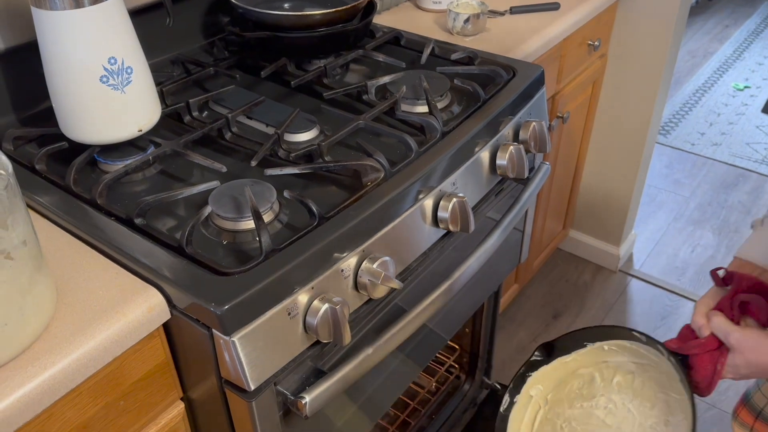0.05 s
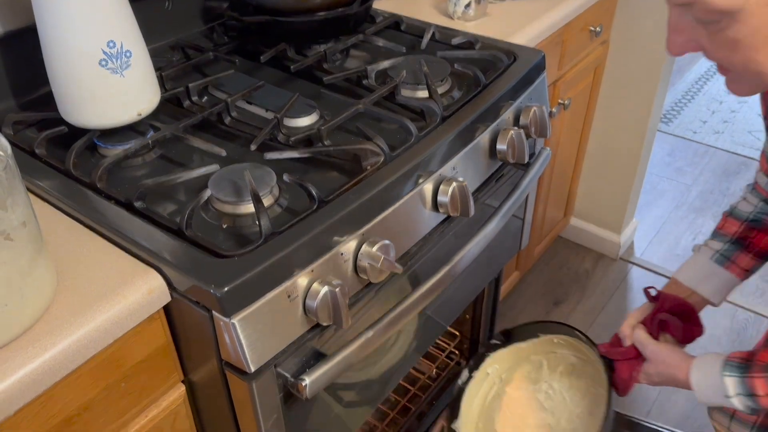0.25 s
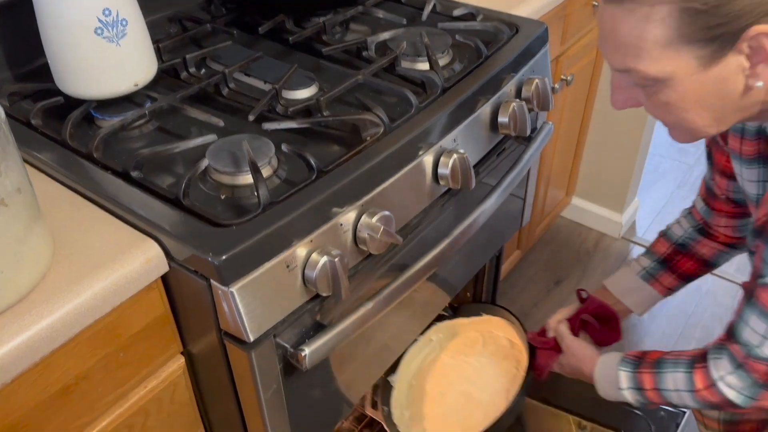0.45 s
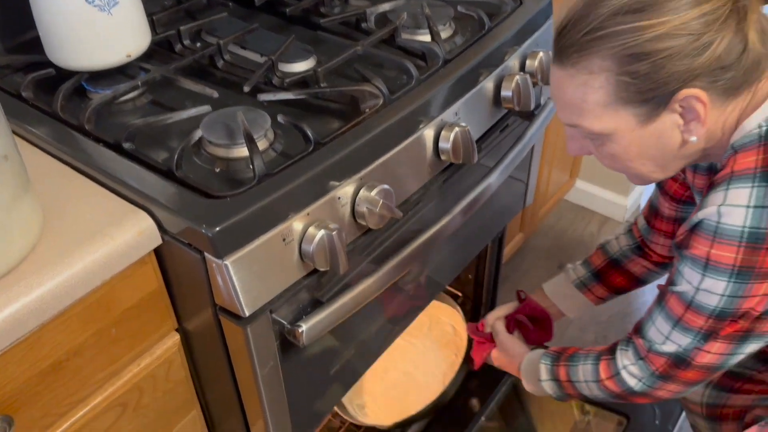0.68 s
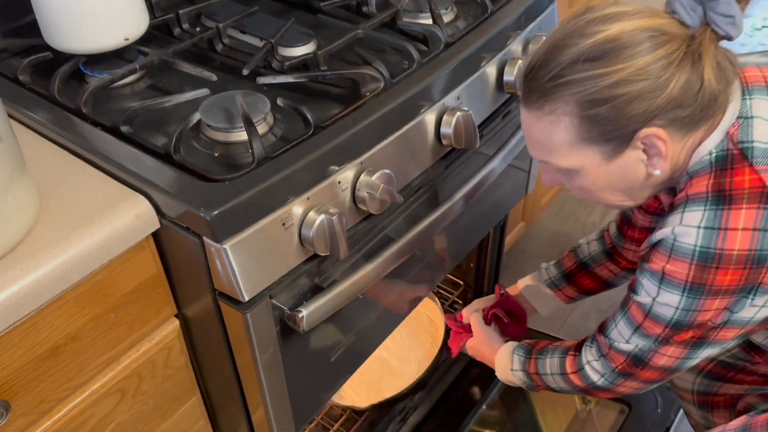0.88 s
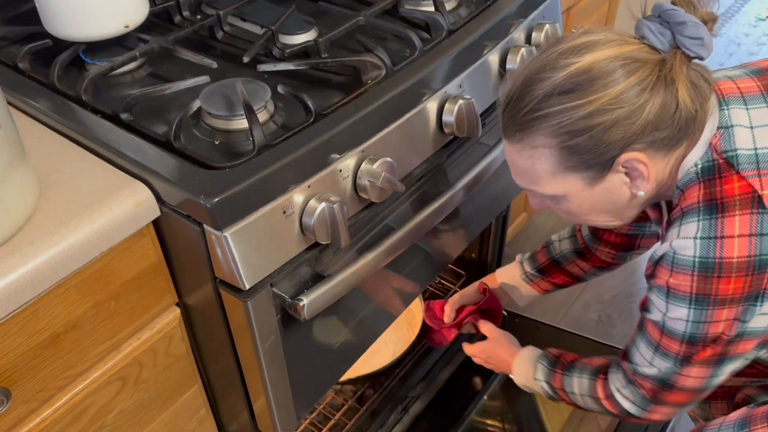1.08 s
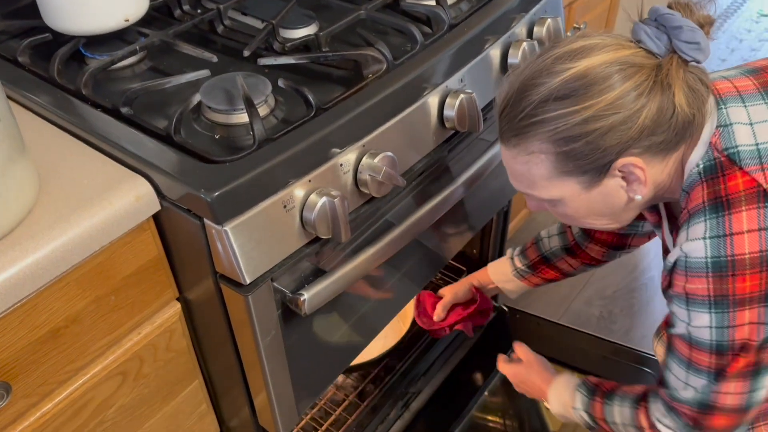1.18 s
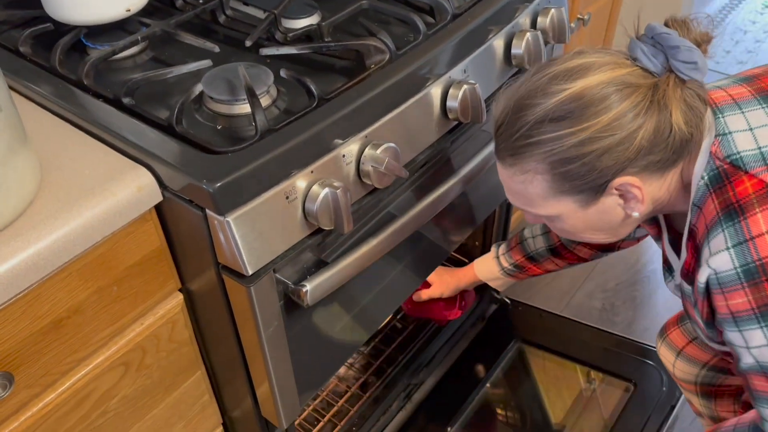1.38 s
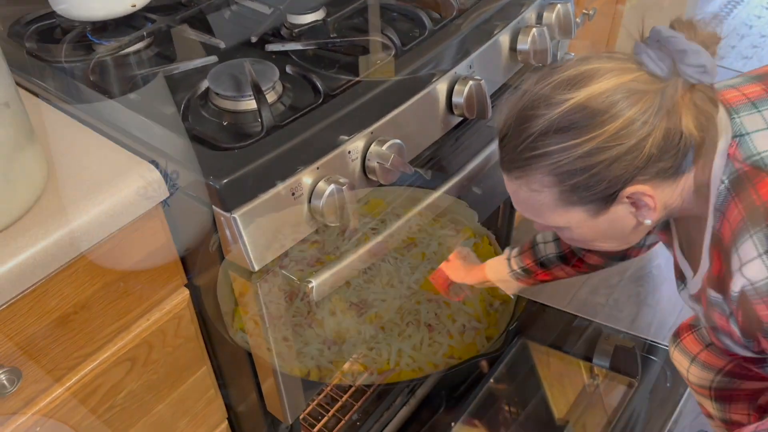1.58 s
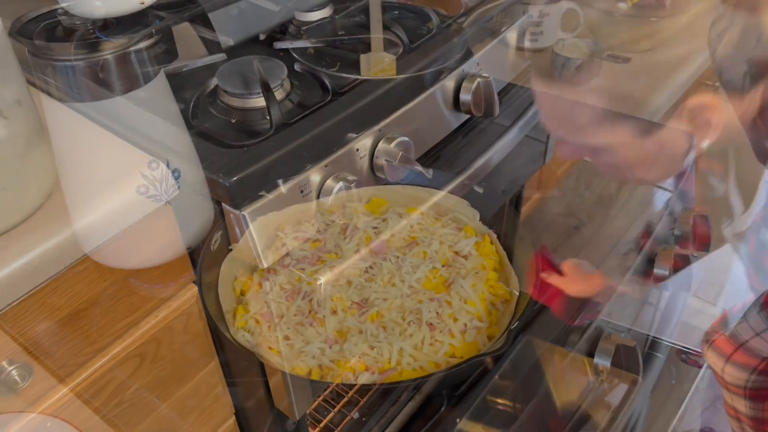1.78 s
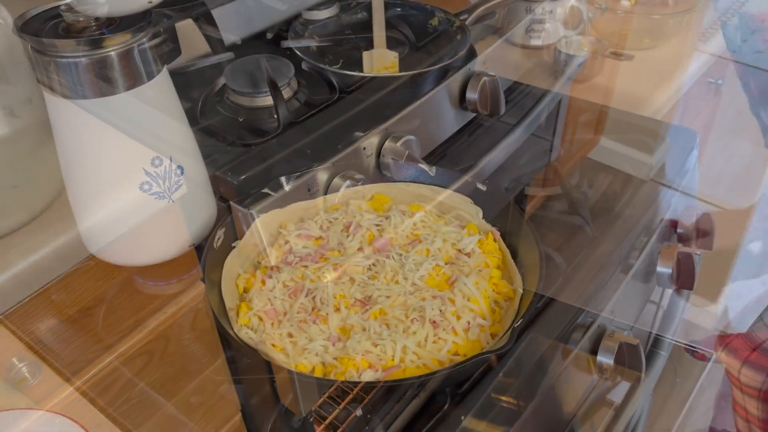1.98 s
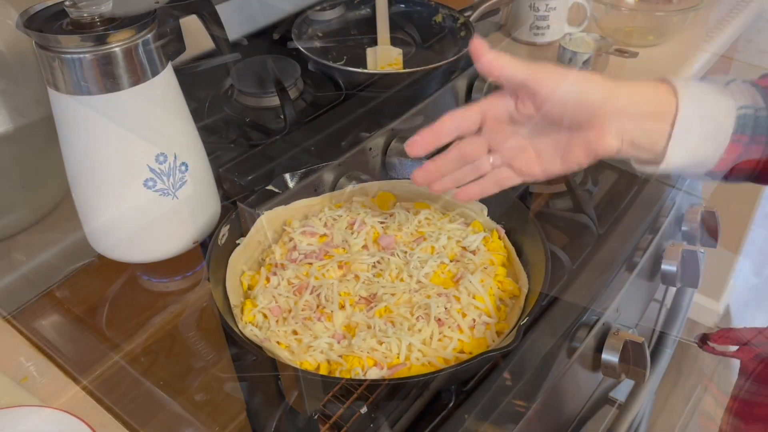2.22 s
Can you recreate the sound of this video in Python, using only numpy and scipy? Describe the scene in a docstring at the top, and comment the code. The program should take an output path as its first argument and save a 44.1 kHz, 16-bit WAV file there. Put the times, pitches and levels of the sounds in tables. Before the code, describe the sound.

A heavy iron pan scrapes over an oven's wire rack in a quiet kitchen. First come a soft rustle and small knocks, until 0.4 seconds, over an electrical hum. At 0.8 the pan lands and slides; a second shove runs from 1.3 to 1.8, jolting over the wires and ringing on. Faint ticks and a tiny squeak follow just after 2 seconds, as the hum becomes a low rumble.

```python
"""A soft rustle and a few small knocks sound over a mains hum in a quiet kitchen. Then a heavy iron pan is
set on an oven's wire rack and pushed in with two scraping shoves. Friction on dense grit drives the modes
of the rack and oven walls; the pan jolts over the wires and rings on in free vibration. Faint ticks and a
squeak follow, while the hum gives way to a lower rumble."""
import sys
import numpy as np
from scipy import signal
from scipy.fft import rfft, irfft
from scipy.io import wavfile
from scipy.ndimage import uniform_filter1d

SR = 44100
rng = np.random.default_rng(int(sys.argv[2]) if len(sys.argv) > 2 else 0)


def pcm_store(signal):
    """Save signal as 16-bit PCM."""
    levels = np.round(np.clip(np.atleast_2d(signal), -1, 1) * 32767)
    wavfile.write(sys.argv[1], SR, levels.astype(np.int16).T)


N = 99225
T = np.arange(N) / SR

# One envelope per shove (time [s], rumble level [dB], scrape level [dB], hiss level [dB])
SHOVE_ENVELOPES = [
    [(0.809, -46, -44, -49), (0.816, -60, -34.5, -43.5), (0.824, -48, -30, -36), (0.836, -27.5, -26, -28),
     (0.86, -31, -29.5, -32.5), (0.93, -38.5, -30.5, -29), (0.962, -36.5, -29, -32.5),
     (1.005, -35, -29.5, -34.5), (1.04, -39, -36, -39), (1.072, -38, -33.5, -39),
     (1.088, -46, -39.5, -43.5), (1.126, -42, -39.5, -49.5), (1.194, -47, -42.5, -52.5),
     (1.244, -53, -47, -57), (1.26, -59, -45, -67)],
    [(1.278, -49.5, -50, -51), (1.294, -55, -41.5, -49.5), (1.362, -47.5, -53.5, -55.5),
     (1.385, -39, -41.5, -47), (1.41, -44.5, -39, -47.5), (1.444, -41.5, -30, -34.5),
     (1.514, -38, -36.5, -42.5), (1.524, -45.5, -30, -34), (1.544, -38, -33.5, -40), (1.652, -44, -42, -52),
     (1.686, -48, -51, -69), (1.7, -60.5, -42, -50), (1.736, -46, -56.5, -55.5), (1.802, -79, -52, -66.5),
     (1.818, -53, -66.5, -64.5), (1.9, -83, -68.5, -99)],
]
# Scrape, heard with a gap in the treble near 11 kHz (frequency [Hz], spectral density [dB])
SCRAPE_AS_HEARD = [(35, -32), (60, 5.5), (111, 8), (146, 10.5), (192, 11.5), (600, 11), (866, 13.5),
                   (963, 7), (1820, 6), (2720, -16.5), (9500, -25), (11400, -72.5), (13500, -30),
                   (16000, -41)]
# Low, dull, bright, high and top bands of the scrape (lower edge [Hz], upper edge [Hz])
SCRAPE_BANDS = [(50, 400), (400, 1000), (1000, 2600), (2600, 9000), (9000, 19000)]
# Treble resonances of thin metal (frequency [Hz], bandwidth [Hz], gain [dB])
METAL_FORMANTS = [(3934, 100, -20), (4830, 900, -5.5), (5730, 320, -9.5), (6920, 790, -7),
                  (8900, 920, -12.5)]
# Brightness of the scrape (time [s], bright band over dull band [dB])
SCRAPE_TILT = [(.86, 4.5), (1., 5), (1.1, 0.5), (1.28, -1), (1.41, 3.5), (1.47, 7.5), (1.54, 3.5),
               (1.62, 3), (1.72, -3)]
# The pan crosses the wires (time [s], relative level [dB], top band gain [dB])
WIRE_JOLTS = [(0.816, -21, -14), (0.8334, -27, 22.5), (1.279, -32, -6), (1.3264, -42, 16.5),
              (1.3764, -37.5, 17.5), (1.4127, -22.5, 5.5), (1.4414, -22.5, 1), (1.518, -47, 2),
              (1.604, -26.5, 5), (1.6524, -31, 2), (1.6928, -29, 5)]
# Rack wires and oven walls (frequency [Hz], level [dB], mid-slide offset [dB], late offset [dB])
RACK_MODES = [(119, 2, 5.5, -11), (205, -8.5, 1, 0.5), (291, -3.5, 5, 6), (439.3, -3.5, 2.5, 7),
              (529, -0.5, -7.5, 5), (606, 3.5, -2, -5.5), (752.4, -2.5, 4, 2.5), (895, -5.5, -3, -7),
              (1116, -9, 2.5, 0), (1293, -1, 2.5, -2.5), (1418, -5, 3, -4), (1790, 10, -12, -25),
              (1960, -9.5, 10.5, -0.5), (2117, 1, 2, -7), (2257, -3, 1, 2), (2853, -21, 5, -6),
              (4000, -11.5, -6, -4.5)]
# Impulses that excite the pan, and those of the ticks (time [s], level [dB])
PAN_NUDGES = [(.95, 4.5), (1.03, -4.5), (1.2, -10), (1.282, 0.5), (1.662, 0), (1.727, -11.5)]
TICK_IMPULSES = [(2.029, -23.5), (2.047, -14)]
# Modes of the pan, the door and the ticks (frequency [Hz], level [dB], decay T60 [s])
PAN_MODES = [(447, -12, .5), (522, -11, .5), (549, -17, 1.4), (772, -11, .6), (811, -9, 1.2), (824, 0, .95),
             (1104, -14, .3), (2040, -19, .4), (2164, -16, .35), (2250, -17, .45)]
DOOR_MODES = [(309, 0.5, 0.056), (247, -2, 0.44)]
TICK_MODES = [(1620, -10, .025), (2480, -17, .015), (3170, -21, .025), (4160, -26, .02)]
# Small knocks (time [s], level [dB], centre frequency [Hz], bandwidth [Hz], decay T60 [s])
KNOCK_BURSTS = [(.129, -53.5, 1090, 1900, 0.089), (0.293, -48.5, 2570, 5450, 0.12),
                (0.294, -61, 14800, 3000, 0.077), (0.293, -51, 740, 197, 0.15),
                (0.368, -55, 915, 1310, 0.19)]
# Rustle, heard with a gap in the treble near 11 kHz (frequency [Hz], spectral density [dB])
RUSTLE_AS_HEARD = [(800, -14), (3000, 0), (5000, -6), (9000, -6), (11400, -24), (14500, -16)]
# Squeak (time [s], duration [s], frequency [Hz], level [dB])
SQUEAK_TONES = [(2.15, 0.04, 2684, -58.5)]
# Mains hum (frequency [Hz], level [dB])
HUM_PARTIALS = [(59.4, -61.5), (119, -56), (179.6, -54.5), (359.5, -72), (382.2, -76)]
# Air and rumble, each heard with a gap in the treble near 11 kHz (frequency [Hz], spectral density [dB])
AIR_AS_HEARD = [(18, -29.5), (30, -3), (183, -8), (227, -9), (330, -18), (595, -27), (776, -23),
                (1060, -35), (1450, -32), (2990, -45), (9500, -47), (11400, -80), (14000, -54)]
RUMBLE_AS_HEARD = [(18, -19), (30, 5), (108, 5.5), (158, -7.5), (435, -14), (540, -9), (609, -20.5),
                   (814, -9), (1350, -26.5), (2460, -33), (3100, -41), (6000, -46), (9500, -47),
                   (11400, -80), (14500, -64)]
# Stereo width (frequency [Hz], side gain [dB])
SIDE_GAIN = [(60, -21), (150, -20), (300, -12), (600, -7), (1500, -7), (4000, -2.5), (8000, -6),
             (14000, -12)]
# Stereo balance (frequency [Hz], left minus right [dB])
BALANCE = [(100, 1.5), (600, -1.5), (1200, -2.5), (2500, -4.5), (4500, 2), (10000, 1.5)]


def pan_on_rack():
    """Superposition: scrape, jolts and rack vibration add; independent contacts feed mid and side."""
    times, *levels = np.vstack(SHOVE_ENVELOPES).T
    rumble, scrape, hiss = (undb(np.interp(T, times, db, left=-120, right=-120)) for db in levels)
    bands = grit_bands()
    return stick_slip(bands, rumble, scrape, hiss) + wire_jolts(bands) + rack_vibration(rumble, scrape)


def grit_bands(grain_db=2):
    """Random excitation: uneven grit gives broadband noise, heard with a gap near 11 kHz."""
    grains = undb(grain_db * np.minimum(rng.exponential(size=N), 4))
    grit = colour(rng.standard_normal((2, N)) * grains, SCRAPE_AS_HEARD)
    low, dull, bright, high, top = (band(grit, *edges, order=3) for edges in SCRAPE_BANDS)
    sheen = sum(undb(db) * band(high, hz - width / 2, hz + width / 2, order=1)
                for hz, width, db in METAL_FORMANTS)
    return low, dull, bright, high + sheen, top


def stick_slip(bands, rumble, scrape, hiss, catch_db=1.5, catch_hz=46):
    """Stick-slip friction: the grit catches and slips, so each layer flutters about its envelope."""
    low, dull, bright, high, top = bands
    tilt = undb(np.interp(T, *np.array(SCRAPE_TILT).T) / 2)
    body = unit(dull / tilt + bright * tilt)
    treble = (high + top) / np.std(high)
    layers = unit(low) * rumble, body * scrape, treble * hiss
    return sum(layer * undb(catch_db * wander(catch_hz)) for layer in layers)


def wire_jolts(bands, gain_db=-15):
    """Impact excitation: brief contact with a wire gives a bright crack and a short noisy decay."""
    _, _, bright, high, top = bands
    out = 0
    for start, db, top_db in WIRE_JOLTS:
        decay = strike(start, attack=0.0021, t60=0.11)
        crack = undb(-4) * strike(start, attack=0.00105, t60=0.025)
        noise = (high + undb(top_db) * top + undb(-12.5) * bright) / np.std(high)
        out += undb(db + gain_db) * (decay + crack) * noise
    return out


def rack_vibration(rumble, scrape, mid_slide_s=.93, late_s=1.1, t60=.15):
    """Forced vibration: friction drives rack and wall modes, whose balance shifts as the pan goes in."""
    uneven_push = rng.standard_normal((2, N)) * undb(-5.5 + 2 * wander(rate_hz=25))
    out = 0
    for hz, db, mid_slide_db, late_db in RACK_MODES:
        envelope = scrape if hz > 400 else rumble
        contact_db = 2.5 * wander(rate_hz=7)  # each wire is touched on and off
        position_db = np.select([T > late_s, T > mid_slide_s], [late_db, mid_slide_db])
        force = uneven_push * envelope * undb(contact_db + position_db)
        out += ring(force, [(hz, db, t60)])
    return out


def pan_ring():
    """Free vibration: the lightly damped iron rings on after each nudge."""
    return ring(impulses(PAN_NUDGES), PAN_MODES)


def knocks():
    """Damped transients: each small knock is a band of noise that decays exponentially."""
    out = 0
    for start, db, hz, width, t60 in KNOCK_BURSTS:
        noise = band(rng.standard_normal(N), max(hz - width / 2, 150), hz + width / 2)
        out += undb(db) * strike(start, attack=0.00093, t60=t60) * unit(noise)
    return out


def rustle(peak_s=0.045, spread_s=0.056):
    """Amplitude modulation: one fluttering swell of hiss from cloth, heard with a gap near 11 kHz."""
    noise = unit(colour(rng.standard_normal(N), RUSTLE_AS_HEARD))
    swell = np.exp(-((T - peak_s) / spread_s) ** 2 / 2)
    return undb(-61.5 + 1.2 * wander(rate_hz=46)) * swell * noise


def door_bump(time_s=.378, level_db=-6):
    """Impulse response: one bump excites two low modes of the door."""
    return ring(impulses([(time_s, level_db)]), DOOR_MODES)


def ticks():
    """Heavy damping: high modes die away so quickly that they are heard as ticks."""
    return ring(impulses(TICK_IMPULSES), TICK_MODES)


def squeak(pitch_fall=.02, roughness=.012):
    """Frequency modulation: a short tone sinks slightly, roughened by random jitter in pitch."""
    out = 0
    for start, duration, hz, db in SQUEAK_TONES:
        progress = np.clip((T - start) / duration, 0, 1)
        pitch = hz * (1 + pitch_fall * np.exp(-progress / 0.3) + roughness * wander(rate_hz=280))
        phase = 2 * np.pi * np.cumsum(pitch) / SR
        out += undb(db) * np.sin(np.pi * progress) * np.sin(phase)
    return out


def reverberation(direct, low_t60=0.26, treble_t60=0.12, gain_db=-10.5):
    """Diffuse reflection: the room's tail decays exponentially, fastest in the treble."""
    noise = rng.standard_normal((2, SR))
    low = signal.lfilter([.25], [1, -.75], noise)
    t = T[:SR]
    tails = low * undb(-60 * t / low_t60) + (noise - low) * undb(-60 * t / treble_t60)
    tails /= np.sqrt(np.sum(tails ** 2, axis=1, keepdims=True))
    return undb(gain_db) * signal.fftconvolve(direct, tails, axes=1)[:, :N]


def mains_hum(waver_db=1.2):
    """Line spectrum: a few low partials of fixed frequency, each wavering slowly in level."""
    out = 0
    for hz, db in HUM_PARTIALS:
        amplitude = np.sqrt(2) * undb(db + waver_db * wander(rate_hz=2.6))
        out += amplitude * np.sin(2 * np.pi * hz * T + 7 * rng.random())
    return out


def ambient_noise(spectrum, level_db):
    """Partial coherence: steady noise, nearly alike in both ears in the bass and wider above."""
    mid, side = colour(rng.standard_normal((2, N)), spectrum)
    return undb(level_db) * unit(left_right(mid, side))


def kitchen(midpoint_s=1.71, fade_s=1):
    """Incoherent sources add in power: hum and air fade by a cosine as the rumble rises by a sine."""
    angle = np.clip((T - midpoint_s) / fade_s + .5, 0, 1) * np.pi / 2
    hum_and_air = mains_hum() + ambient_noise(AIR_AS_HEARD, level_db=-52.5)
    rumble = ambient_noise(RUMBLE_AS_HEARD, level_db=-47.5)
    return np.cos(angle) * hum_and_air + np.sin(angle) * rumble


def undb(db):
    """Decibel law: 20 dB is a factor of ten in amplitude."""
    return 10 ** (np.asarray(db) / 20)


def unit(x):
    """Normalisation to an RMS of one."""
    return x / np.sqrt(np.mean(x ** 2))


def colour(x, points):
    """Zero-phase filtering through points of (frequency [Hz], gain [dB])."""
    hz, db = np.array(points, float).T
    bins_hz = np.maximum(np.arange(N + 1) * SR / (2 * N), 1)
    gain = undb(np.interp(np.log(bins_hz), np.log(hz), db))
    return irfft(rfft(x, 2 * N) * gain)[..., :N]


def band(x, lo_hz, hi_hz, order=2):
    """Band-pass filtering with a maximally flat passband."""
    edges = [lo_hz, min(hi_hz, .45 * SR)]
    return signal.sosfilt(signal.butter(order, edges, "band", fs=SR, output="sos"), x)


def ring(force, modes):
    """Modal superposition: damped resonators respond to a common force."""
    out = 0
    for hz, db, t60 in modes:
        radius = np.exp(-np.log(1000) / (t60 * SR))
        angle = 2 * np.pi * hz / SR
        response = signal.lfilter([np.sin(angle)], [1, -2 * radius * np.cos(angle), radius ** 2], force)
        out += undb(db) * np.sqrt(1 - radius) * response
    return out


def wander(rate_hz):
    """Random modulation: smoothed noise with an RMS of one."""
    span = int(SR / rate_hz)
    return unit(uniform_filter1d(uniform_filter1d(rng.standard_normal(N), span), span))


def strike(start, attack, t60):
    """Impact envelope: a quick rise and an exponential decay, with times in seconds."""
    age = np.maximum(T - start, 0)
    return (1 - np.exp(-age / attack)) * undb(-60 * age / t60)


def impulses(rows):
    """Finite contact time: each push at (time [s], level [dB]) is a narrow triangular pulse."""
    force = np.zeros(N)
    for start, db in rows:
        force[int(start * SR)] = undb(db)
    return uniform_filter1d(uniform_filter1d(force, size=5), size=5)


def left_right(mid, side):
    """Sum and difference stereo: the filtered side signal sets the width."""
    side = colour(side, SIDE_GAIN)
    return np.array([mid + side, mid - side])


def scene():
    """Superposition of direct sound, reverberation and the kitchen background."""
    sliding = pan_on_rack()
    small_sounds = knocks() + rustle() + door_bump() + ticks() + squeak()
    mid_side_gains = np.array([[1], [0.94]])
    direct = sliding + (pan_ring() + small_sounds) * mid_side_gains
    mid, side = direct + reverberation(direct)
    left, right = left_right(mid, side)
    left = colour(left, [(hz, db / 2) for hz, db in BALANCE])
    right = colour(right, [(hz, -db / 2) for hz, db in BALANCE])
    return np.array([left, right]) + kitchen()


def record(dry, bass_hz=32, top_hz=16300):
    """Band limiting: the microphone drops the deepest bass, and the top is cut steeply."""
    dry = signal.sosfilt(signal.butter(3, bass_hz, "high", fs=SR, output="sos"), dry)
    return signal.sosfilt(signal.ellip(10, .2, 80, top_hz, fs=SR, output="sos"), dry)


dry = scene()
out = record(dry)
pcm_store(out)
```